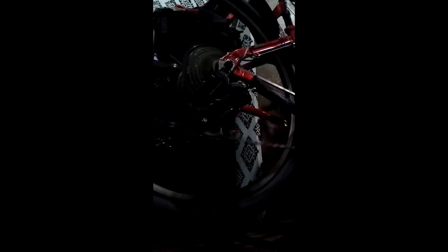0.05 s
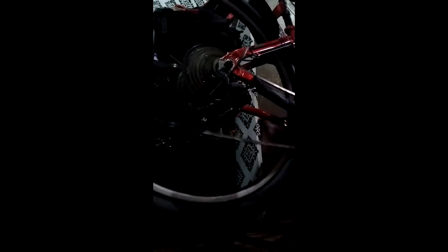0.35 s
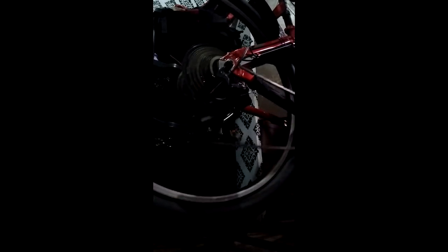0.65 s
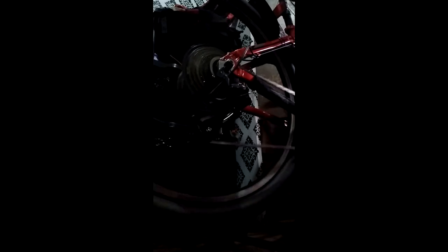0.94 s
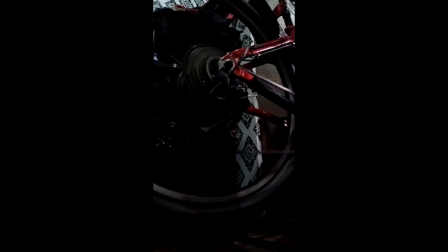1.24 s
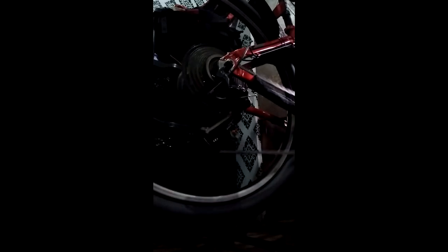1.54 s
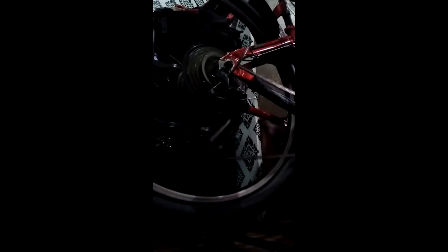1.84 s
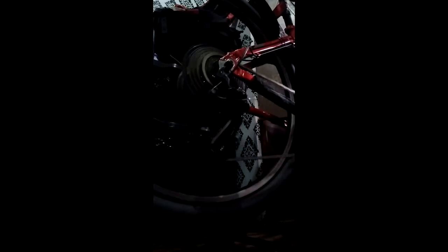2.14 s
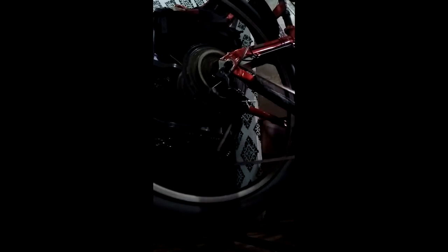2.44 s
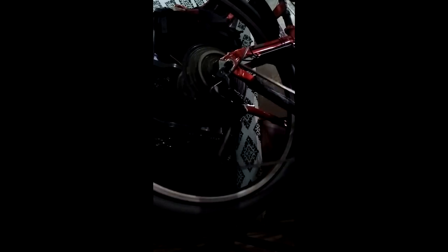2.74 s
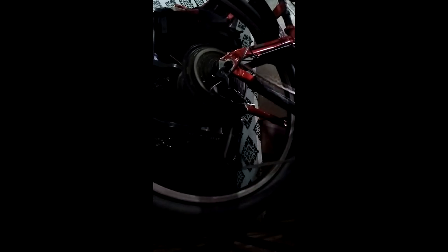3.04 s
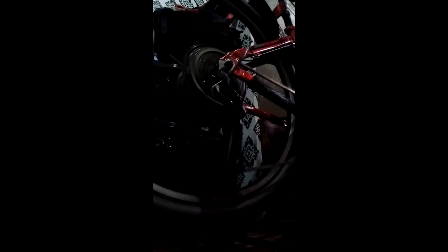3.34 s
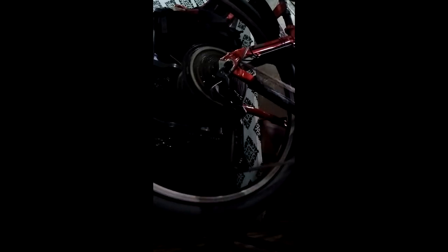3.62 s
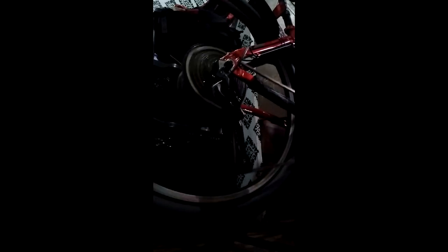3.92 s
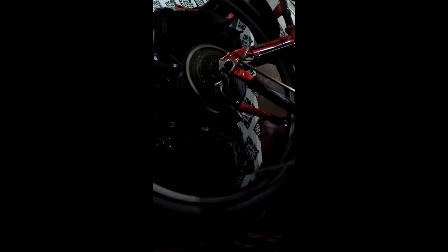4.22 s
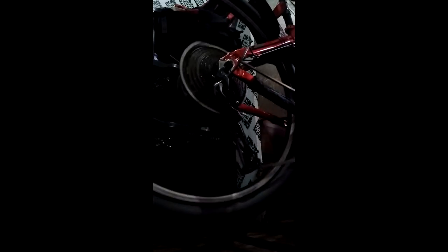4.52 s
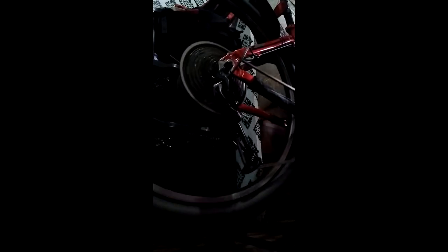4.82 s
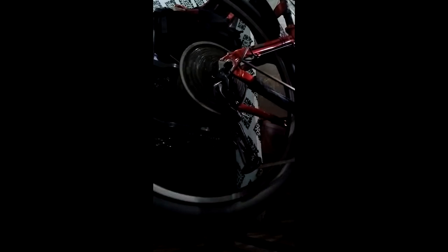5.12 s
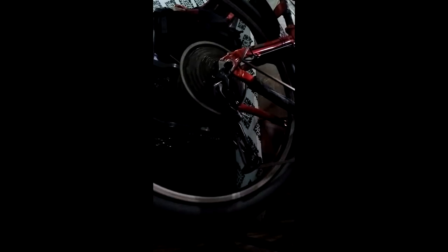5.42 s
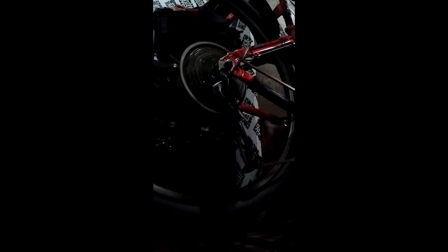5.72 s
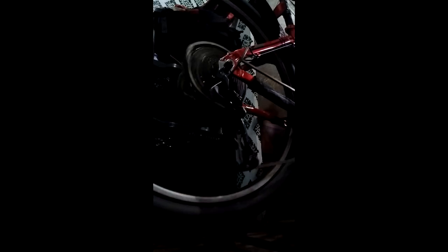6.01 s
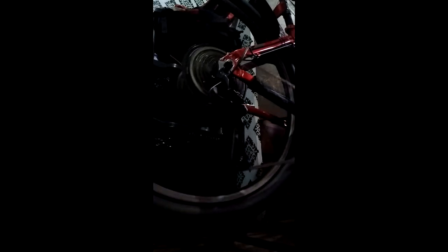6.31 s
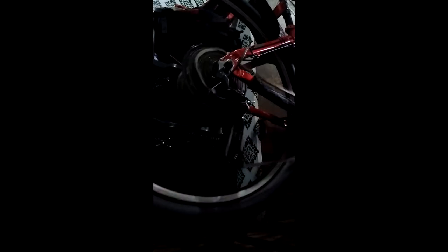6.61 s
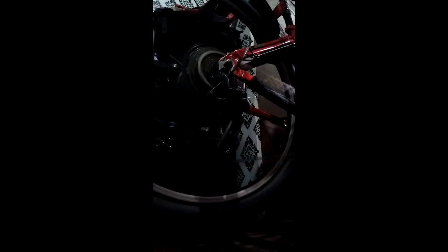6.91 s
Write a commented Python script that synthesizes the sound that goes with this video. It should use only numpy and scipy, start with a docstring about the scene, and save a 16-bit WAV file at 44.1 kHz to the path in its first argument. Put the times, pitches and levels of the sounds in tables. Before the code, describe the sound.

A bicycle chain whirs and clacks through gear changes while the rear hub ticks faster and faster, then slows.

```python
"""Bicycle shifting on a stand.

Cranked indoors, heard close, shifted up the cassette and back down. The rear wheel outruns the slowing
cogs, so the freehub pawl ticks, faster on the larger cogs. The chain whirrs, clicks and drops from cog
to cog; the shifter knocks through the frame. Behind it: low thumps, stand rumble and mains hum."""
import sys
import numpy as np
from scipy import signal
from scipy.fft import rfft, irfft
from scipy.io import wavfile
from scipy.ndimage import uniform_filter1d

SR = 44100
rng = np.random.default_rng(int(sys.argv[2]) if len(sys.argv) > 2 else 0)


def generate_wav(signal):
    """Clip the signal to [-1, 1] and save it as 16-bit WAV at the path in sys.argv[1]."""
    frames = np.transpose(np.atleast_2d(signal))
    scaled = np.clip(frames, -1, 1) * 32767
    pcm = np.round(scaled).astype(np.int16)
    wavfile.write(sys.argv[1], SR, pcm)


N = 311341
T = np.arange(N) / SR

# Spectra. Each row: frequency in Hz, relative density in dB.
AIR_SPECTRUM = [(20, 0.5), (60, -15), (100, -3), (160, -2.5), (300, -12), (700, -10), (2000, -12.5),
                (6000, -46.5), (15000, -22.5)]
WHIRR_SPECTRUM = [(150, -33.5), (350, 3.5), (650, 4), (1000, 1.5), (1500, 2), (2300, -7), (3200, 0.5),
                  (5300, -7), (7800, 6), (10500, -10), (15000, -1.5)]
THUD_SPECTRUM = [(100, -27), (250, -4), (600, 2.5), (900, -2), (1800, 2.5), (2800, -2.5), (4500, -18),
                 (15000, -61)]
CLACK_SPECTRUM = [(150, -5), (400, -14.5), (650, -18), (950, -18), (1300, 4), (1750, -3), (3000, -9),
                  (6000, -8.5), (15000, -45)]
LINK_SPECTRUM = [(200, -14), (1400, -12), (2400, -9), (5200, -16), (6800, -7), (8000, 0.5), (10000, -11),
                 (12500, -5.5), (15000, 2.5)]
PAWL_SPECTRUM = [(9000, -45), (12500, -24), (13500, -11), (14150, -6), (14550, 0), (15100, -2), (15700, -2),
                 (16200, -12)]
RATCHET_SPECTRUM = [(300, -32), (1500, -21), (3200, -14), (4050, -7), (5100, -15), (6700, -12), (7350, 0),
                    (7800, 8.5), (8250, 3), (9000, -3.5), (11000, -6), (11700, -0.5), (12400, -11),
                    (15000, -39)]
SHELL_SPECTRUM = [(800, -39), (1700, -12), (1980, -12.5), (2120, 2), (2350, 0.5), (2550, -7), (2800, -11),
                  (3500, -33.5), (8000, -41)]
# Frame and derailleur cage modes. Each row: frequency in Hz, relative level in dB, T60 in seconds.
FRAME_MODES = [(248, -9, 0.26), (325.4, 1, 0.64), (342, -10, 0.25), (514.5, -2, 0.34), (600.4, 8, 0.11),
               (643, 4, 0.15), (684, -2.5, 0.28), (877, -11.5, 0.17), (975, -2.5, 0.23)]
CAGE_MODES = [(678, -6.5, 0.16), (743, -15, 0.082), (1225, -0.5, 0.031), (1234, 0, 0.15), (1530, -7, 0.074),
              (1775, 3, 0.084)]
# Stand rocking. Each row: centre in seconds, half width in seconds, drum rise in dB, floor rise in dB.
WOBBLES = [(2.832, 0.078, 15, 16.5), (4.77, 0.25, 17, 11), (5.3, 0.21, 9, 4), (6.12, 0.47, 6, 8)]
# Low thumps. Each row: start in seconds, tap level in dB, swell level in dB.
THUMPS = [(2.815, -37, -34), (3.257, -58, -39), (6.6598, -26, -22.5)]
# Jockey wheel squeak. Each row: start in seconds, length in seconds, pitch in Hz, level in dB.
SQUEAKS = [(3.635, 0.14, 1000, -46)]
# Chain whirr, louder when cranked harder. Each row: time in seconds, relative level in dB.
WHIRR_LEVELS = [(0, -52.5), (1.5, -50), (2.8, -47), (3.5, -51), (4.5, -46.5), (4.85, -45), (5.2, -45.5),
                (6.25, -45.5), (7.0, -50)]
# Shifter knocks. Each row: start in seconds, relative level in dB, ring offset in dB, ring pitch ratio.
SHIFTER_KNOCKS = [(0.334, -40.5, 1, 1), (0.939, -39, -2, 1), (1.185, -38.5, -2, 1), (1.70, -49, -4, 0.89),
                  (2.24, -50, 1, 0.85), (2.829, -32.5, -17, 1), (3.261, -41, -5.5, 1.15),
                  (4.204, -43, -4.5, 0.91)]
# Chain landings. Each row: start in seconds, relative level in dB, rattle offset in dB.
CHAIN_DROPS = [(0.5055, -27.5, -10), (1.1794, -32, -2), (1.691, -27.5, -2), (2.2314, -32, 4),
               (2.7335, -27.5, -1), (3.232, -33.5, -3), (3.7676, -30.5, 1), (4.2221, -31, 0.5),
               (5.6918, -33.5, 1), (5.779, -37.5, 3.5), (5.9046, -34.5, 2), (5.9835, -32, 3.5),
               (6.1317, -37.5, 3), (6.2166, -37, 10.5), (6.253, -30.5, 1), (6.4198, -38.5, 3),
               (6.52, -34, 3.5), (6.554, -41, -15), (6.7655, -35.5, 5.5), (7.034, -35.5, 8)]
# Links catching on teeth. Each row: start in seconds, relative level in dB, contact time in seconds.
LINK_CATCHES = [(0.066, -34, .0009), (0.1057, -21.5, 0.00091), (0.332, -33.5, 0.0013), (0.4835, -25, .001),
                (0.5053, -13, 0.0026), (0.5567, -21.5, 0.0011), (0.592, -29, 0.0015), (0.6165, -9.5, 0.001),
                (0.672, -21, .001), (1.062, -30, 0.0024), (1.0778, -29.5, .001), (1.104, -14, 0.0012),
                (1.129, -15.5, 0.0066), (1.1765, -17, .0014), (1.372, -33.5, 0.00056),
                (1.731, -17.5, 0.0033), (2.024, -21, 0.0057), (2.3434, -23.5, 0.0019),
                (2.4469, -22.5, 0.0025), (3.226, -19.5, 0.0035), (3.729, -16, 0.0016), (4.877, -20, 0.0021),
                (5.69, -14, 0.0019), (5.851, -22.5, 0.0036), (6.001, -17, 0.0022), (6.134, -20.5, 0.001),
                (6.2208, -19, 0.0031), (6.2442, -19.5, .002), (6.4153, -17, 0.003), (6.5168, -24, 0.0041),
                (6.5525, -21, 0.0025), (6.6598, -13.5, 0.0014), (6.899, -16.5, 0.0021),
                (7.018, -23, 0.0023)]
# Single slips as the wheel starts to outrun the cogs.
# Each row: start in seconds, relative force in dB, shell ring offset in dB.
FIRST_TICKS = [(1.4236, -6, 3.5), (1.6053, -2, 5.5), (1.6897, 1, -8), (1.8197, 1, -1.5),
               (1.9203, -2.5, 1.5), (1.9772, -3.5, 2.5), (2.036, -5.5, 4.5), (2.0964, 0, 2.5),
               (2.166, -1, -1), (2.2266, -2, -5)]
# Steady slip. Each row: time in seconds, rate in ratchet teeth per second.
SLIP_RATES = [(2.31, 16.98), (2.49, 21.67), (2.55, 17.11), (2.89, 22.15), (3.0, 32.01), (3.19, 20.95),
              (3.27, 25.96), (3.49, 27.49), (3.62, 37.83), (3.75, 28.12), (4.17, 35.43), (4.27, 41.39),
              (4.49, 32.81), (4.66, 41.62), (4.76, 37.71), (4.97, 40.98), (5.38, 35.03), (5.46, 31.58),
              (5.55, 36.55), (6.1, 31.58), (6.23, 37.0), (6.31, 27.76), (6.58, 29.56), (6.64, 24.42),
              (6.79, 26.3), (7.06, 15.92)]
# Pawl drop in steady slip. Each row: time in seconds, relative force in dB.
PAWL_FORCES = [(2.3, -2), (2.55, -1), (2.8, 4.5), (3.1, -2.5), (3.55, -4.5), (3.8, -2.5), (4.7, -1.5),
               (4.93, -1), (5.5, 0), (5.65, -1.5), (7.0, -2)]


def undb(db):
    """Decibels to gain."""
    return 10 ** (np.asarray(db) / 20)


def unit(x):
    """Scale to rms 1."""
    return x / np.sqrt(np.mean(x ** 2))


def unit_hit(x):
    """Scale to the energy of 10 ms at rms 1."""
    return x / np.sqrt(np.sum(x ** 2) / (SR / 100))


def clock(length_s):
    """Time axis in seconds."""
    return np.arange(int(length_s * SR)) / SR


def add(track, start_s, sound):
    """Mix a sound into a track."""
    i = int(np.clip(start_s * SR, 0, N - 1))
    track[i:i + len(sound)] += sound[:N - i]


def convolve(x, response):
    """Apply an impulse response, keeping the input length."""
    return signal.fftconvolve(x, response)[:len(x)]


def butter(x, kind, cutoff_hz, order=2):
    """Butterworth filter."""
    return signal.sosfilt(signal.butter(order, cutoff_hz, kind, fs=SR, output="sos"), x)


def noise_band(low_hz, high_hz):
    """Band noise at rms 1."""
    return unit(butter(rng.standard_normal(N), "bandpass", [low_hz, high_hz], order=3))


def body(spectrum, size=2048):
    """Minimum-phase impulse response of a spectrum, unit energy."""
    hz, db = np.transpose(spectrum)
    bins_hz = np.arange(size // 2 + 1) * SR / size
    gain_db = np.interp(np.log(bins_hz + 1), np.log(hz), db)
    cepstrum = irfft(np.log(undb(gain_db)))
    cepstrum[1:size // 2] *= 2
    cepstrum[size // 2 + 1:] = 0
    response = irfft(np.exp(rfft(cepstrum)))
    return response / np.linalg.norm(response)


def ring(modes, t, detune):
    """Decaying modes; weight and pitch vary per blow."""
    out = 0
    for hz, db, t60_s in modes:
        envelope = undb(db + 2 * rng.standard_normal()) * np.exp(-np.log(1000) * t / t60_s)
        pitch_hz = hz * (1 + detune * rng.standard_normal())
        out = out + envelope * np.sin(2 * np.pi * pitch_hz * t)
    return out


def chatter(t, rise_s, decay_s, grain_db):
    """Uneven micro-impacts that swell and die away."""
    grains = np.repeat(rng.standard_normal(len(t) // 20 + 1), 20)[:len(t)]
    envelope = (1 - np.exp(-t / rise_s)) * np.exp(-t / decay_s)
    return rng.standard_normal(len(t)) * undb(grain_db * grains) * envelope


def room(x, split_hz=4500):
    """Small room: direct sound plus a diffuse tail whose treble dies first."""
    t = clock(0.5)
    tail = 0
    for kind, t60_s, db in (("lowpass", 0.81, -6), ("highpass", 0.28, -7.5)):
        envelope = np.exp(-np.log(1000) * t / t60_s) * (1 - np.exp(-t / 0.00062))
        echoes = rng.standard_normal(len(t)) * envelope
        tail = tail + undb(db) * butter(echoes / np.linalg.norm(echoes), kind, split_hz)
    return x + convolve(x, tail)


def limiter(x, threshold_db=-18, slope=0.7, release_s=0.15):
    """Loud clicks cut the gain at once; it creeps back, so the hum ducks and recovers."""
    level_db = 10 * np.log10(np.abs(uniform_filter1d(x ** 2, size=132)) + 1e-12)
    over_db = np.maximum(level_db - threshold_db, 0)
    release = np.exp(-T / release_s)
    held_db = np.maximum.accumulate(over_db / release) * release
    return x * undb(-slope * uniform_filter1d(held_db, size=176))


def hum_and_air(hum_hz=120, hum_db=-38, air_db=-46.5):
    """Wavering hum at twice the mains frequency over low room murmur."""
    hum = np.sqrt(2) * np.sin(2 * np.pi * hum_hz * T)
    waver_db = 0.5 * noise_band(low_hz=1.7, high_hz=7.8)
    air = convolve(rng.standard_normal(N), body(AIR_SPECTRUM, size=8192))
    return undb(hum_db + waver_db) * hum + undb(air_db) * air


def stand_rumble(drum_db=-61, floor_db=-52.5):
    """The wheel drums the stand, the stand shakes the floor; both rise while it rocks."""
    for centre_s, half_s, drum_rise_db, floor_rise_db in WOBBLES:
        rocking = np.exp(-((T - centre_s) / half_s) ** 2)
        drum_db = drum_db + drum_rise_db * rocking
        floor_db = floor_db + floor_rise_db * rocking
    drum = undb(drum_db) * noise_band(low_hz=114, high_hz=233)
    floor = undb(floor_db) * noise_band(low_hz=22, high_hz=78)
    return drum + floor


def low_thumps(tap_band_hz=(230, 1100)):
    """A light tap with a slow, deep swell: two with shifter knocks, one near the end."""
    out = np.zeros(N)
    t = clock(0.14)
    swell = np.sin(np.pi * t / t[-1]) ** 2
    for start_s, tap_db, swell_db in THUMPS:
        tap = butter(chatter(t, rise_s=0.0001, decay_s=0.0019, grain_db=-1), "bandpass", tap_band_hz)
        add(out, start_s, undb(tap_db) * unit_hit(tap) + undb(swell_db) * swell)
    return out


def jockey_squeak(waver=0.0071):
    """A dry jockey wheel sings one brief, unsteady note."""
    out = np.zeros(N)
    for start_s, length_s, hz, db in SQUEAKS:
        t = clock(length_s)
        drift = unit(uniform_filter1d(rng.standard_normal(N), size=400))[:len(t)]
        pitch_hz = hz * (1 + waver * drift)
        tone = np.sqrt(2) * np.sin(2 * np.pi * np.cumsum(pitch_hz) / SR)
        add(out, start_s, undb(db) * np.sin(np.pi * t / length_s) * tone)
    return out


def chain_whirr(link_hz=68, jitter_links=0.25, scatter_db=2.5):
    """Rollers seat on the teeth in turn, over the rub of the jockey wheels."""
    seats = np.zeros(N)
    t = clock(0.008)
    for link, (late, size) in enumerate(rng.standard_normal((700, 2))):
        seat = chatter(t, rise_s=0.000068, decay_s=0.0021, grain_db=-1.5)
        add(seats, (link + jitter_links * late) / link_hz, undb(scatter_db * np.tanh(size)) * seat)
    friction = unit(rng.standard_normal(N) + 1.14 * unit(seats))
    rub = undb(4.5) * convolve(friction, body(WHIRR_SPECTRUM))
    rollers = undb(6.5) * convolve(unit(seats), body(LINK_SPECTRUM))
    level_db = np.interp(T, *np.transpose(WHIRR_LEVELS))
    return undb(level_db) * (rub + rollers)


def shifter():
    """Each cable pull gives a dull, scraping knock that rings the frame."""
    thuds, rings = np.zeros((2, N))
    t = clock(0.7)
    for start_s, db, ring_db, pitch_ratio in SHIFTER_KNOCKS:
        thud = chatter(t, rise_s=0.0035, decay_s=0.025, grain_db=-1)
        add(thuds, start_s, undb(db) * unit_hit(thud))
        modes = [(hz * pitch_ratio, mode_db, t60_s) for hz, mode_db, t60_s in FRAME_MODES]
        shake = chatter(t, rise_s=0.005, decay_s=0.066, grain_db=5)
        frame = convolve(shake, ring(modes, t, detune=0.019))
        add(rings, start_s, undb(db + ring_db) * unit_hit(frame))
    return undb(7) * convolve(thuds, body(THUD_SPECTRUM)) + undb(7.5) * rings


def chain_drops():
    """The chain clacks on to a cog, the derailleur cage rings, loose links rattle."""
    clacks, cage, rattles = np.zeros((3, N))
    t = clock(0.25)
    for start_s, db, rattle_db in CHAIN_DROPS:
        clack = chatter(t, rise_s=0.000067, decay_s=0.04, grain_db=4)
        add(clacks, start_s, undb(db) * unit_hit(clack))
        add(cage, start_s, undb(db) * unit_hit(ring(CAGE_MODES, t, detune=0.021)))
        rattle = chatter(t, rise_s=0.00048, decay_s=0.021, grain_db=7)
        add(rattles, start_s, undb(db + rattle_db) * unit_hit(rattle))
    clacks = convolve(clacks, body(CLACK_SPECTRUM))
    rattles = convolve(rattles, body(LINK_SPECTRUM))
    return undb(2) * clacks + undb(-4) * cage + undb(14.5) * rattles


def link_clicks(clean_contact_s=0.0019):
    """Side plates snap against teeth and settle; quicker snaps chatter less."""
    out, plate = np.zeros(N), body(LINK_SPECTRUM)
    t = clock(0.05)
    for start_s, db, contact_s in LINK_CATCHES:
        snap = unit_hit(chatter(t, rise_s=0.0002, decay_s=contact_s, grain_db=3))
        settle = unit_hit(chatter(t, rise_s=0.0026, decay_s=0.007, grain_db=-2.5))
        settle_gain = undb(-0.5) * min(contact_s / clean_contact_s, 1)
        add(out, start_s, undb(db) * unit_hit(convolve(snap + settle_gain * settle, plate)))
    return undb(3) * out


def slip_ticks(force_scatter_db=2.05, ring_scatter_db=2.5, ring_db_per_hz=0.06):
    """One tick per tooth passing the pawl; faster slip rings the shell harder."""
    slip_s = T[T >= SLIP_RATES[0][0]]
    teeth = np.cumsum(np.interp(slip_s, *np.transpose(SLIP_RATES))) / SR
    starts_s = np.interp(np.arange(int(teeth[-1]) + 1), teeth, slip_s)
    force_spread, ring_spread = rng.standard_normal((len(starts_s), 2)).T
    force_db = np.interp(starts_s, *np.transpose(PAWL_FORCES)) + force_scatter_db * force_spread
    rate_hz = np.interp(starts_s, *np.transpose(SLIP_RATES))
    ring_db = ring_db_per_hz * (rate_hz - rate_hz.mean()) + ring_scatter_db * ring_spread
    return list(zip(starts_s, force_db, ring_db))


def freehub(snap_scatter_db=0.9):
    """At each tick the pawl pings, snaps in the ratchet ring and rings the hub shell."""
    pings, snaps, rings = np.zeros((3, N))
    pawl, ratchet, shell = body(PAWL_SPECTRUM), body(RATCHET_SPECTRUM), body(SHELL_SPECTRUM)
    t = clock(0.05)
    samples = np.arange(len(shell))
    for start_s, force_db, ring_db in list(FIRST_TICKS) + slip_ticks():
        snap_db = force_db + snap_scatter_db * rng.standard_normal()
        stretch = np.exp(0.5 * np.tanh(rng.standard_normal()))  # glancing drops scrape longer
        contact = unit_hit(chatter(t, rise_s=0.0003 * stretch, decay_s=0.0018 * stretch, grain_db=3))
        bounces = unit_hit(chatter(t, rise_s=0.002, decay_s=0.005, grain_db=7.5))
        add(pings, start_s, undb(force_db) * unit_hit(convolve(contact + undb(-9) * bounces, pawl)))
        add(snaps, start_s, undb(snap_db) * unit_hit(convolve(contact + undb(-0.5) * bounces, ratchet)))
        # The turning hub is struck at a new spot, so its resonances shift.
        pitch_ratio = 1 + 0.038 * np.tanh(rng.standard_normal())
        spot = np.interp(samples * pitch_ratio, samples, shell)
        strike = chatter(t, rise_s=0.0002, decay_s=0.012, grain_db=2.5)
        add(rings, start_s, undb(force_db + ring_db) * unit_hit(convolve(strike, spot)))
    return undb(-14) * pings + undb(-25.5) * snaps + undb(-29) * rings


def scene():
    """The bicycle in its room, mono."""
    bicycle = freehub() + link_clicks() + chain_drops() + shifter() + chain_whirr() + jockey_squeak()
    return (room(bicycle) + stand_rumble() + low_thumps() + hum_and_air())[None]


def record(dry):
    """Limiter, then a steep low-pass."""
    cutoff_hz = 15800
    lowpass = signal.ellip(10, 0.2, 70, cutoff_hz, fs=SR, output="sos")
    return signal.sosfilt(lowpass, limiter(dry[0]))[None]


dry = scene()
out = record(dry)
generate_wav(out)
```